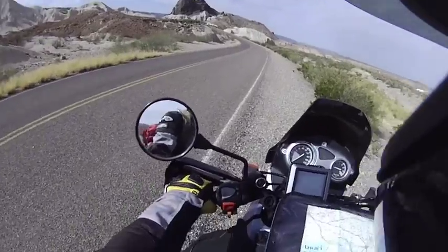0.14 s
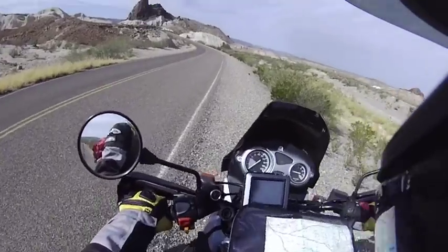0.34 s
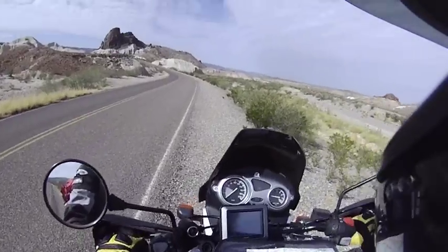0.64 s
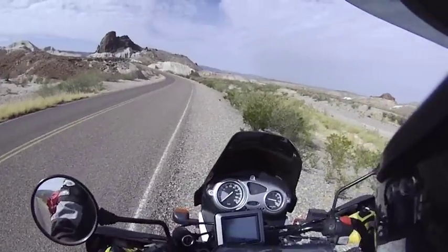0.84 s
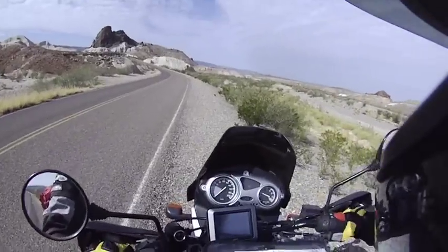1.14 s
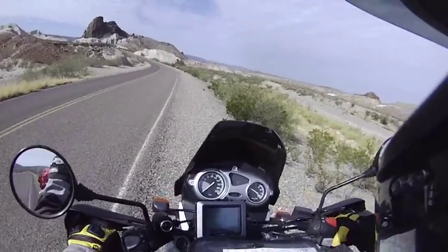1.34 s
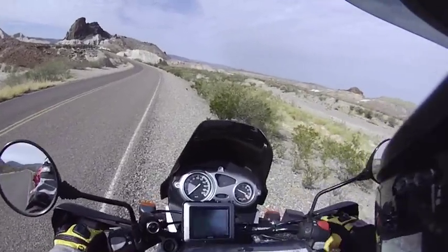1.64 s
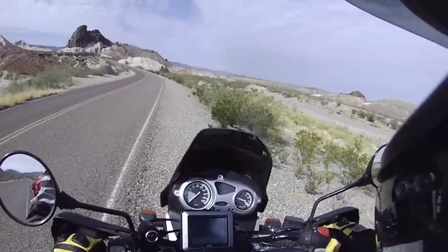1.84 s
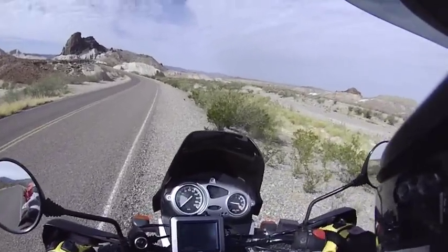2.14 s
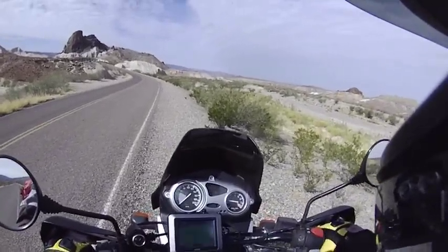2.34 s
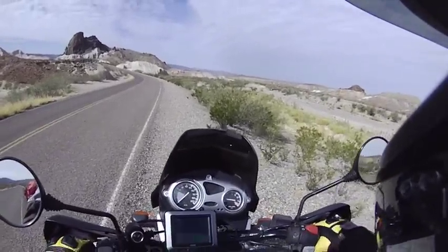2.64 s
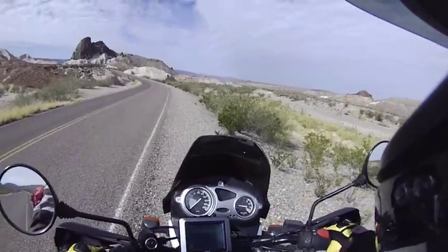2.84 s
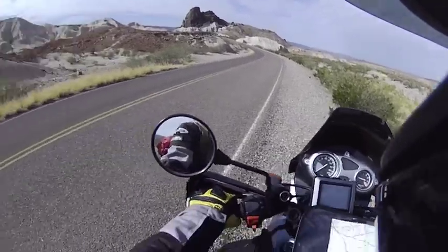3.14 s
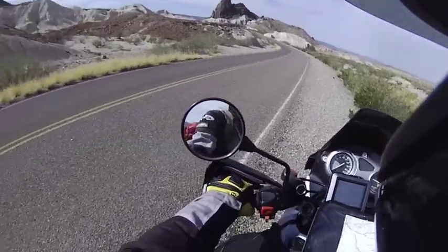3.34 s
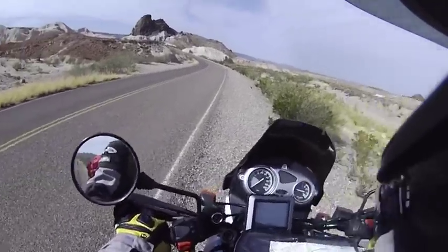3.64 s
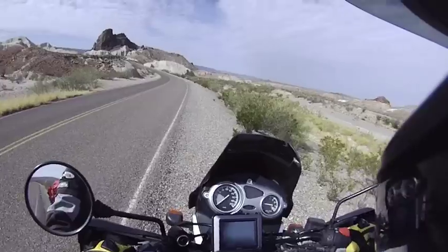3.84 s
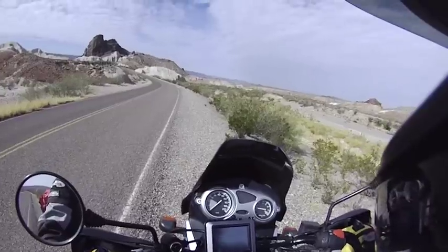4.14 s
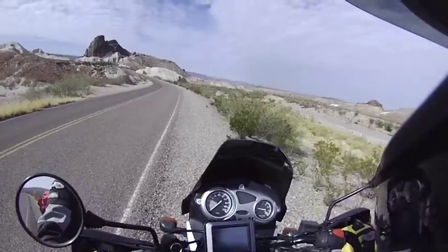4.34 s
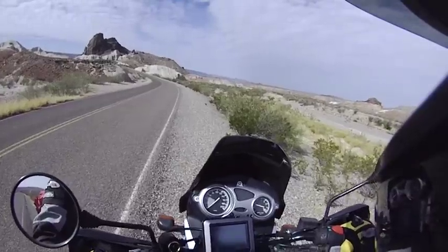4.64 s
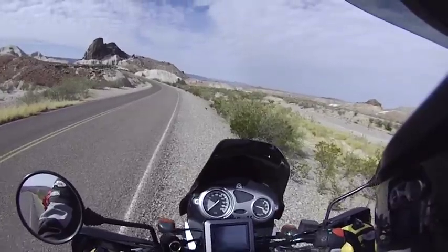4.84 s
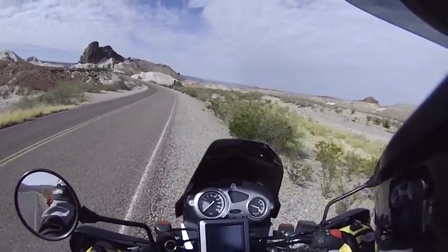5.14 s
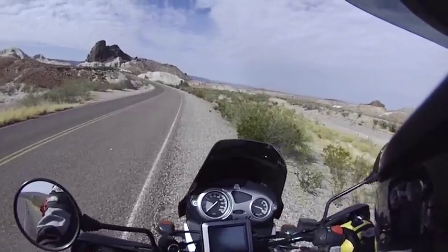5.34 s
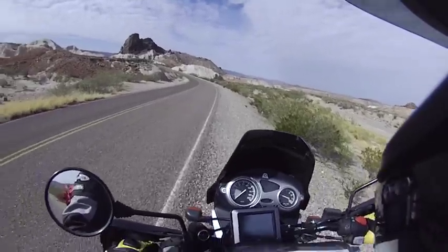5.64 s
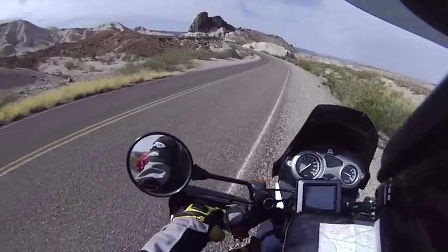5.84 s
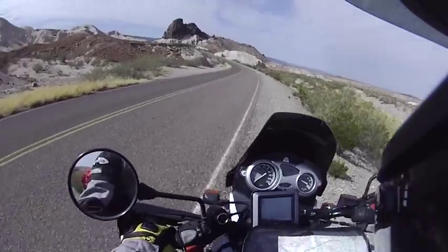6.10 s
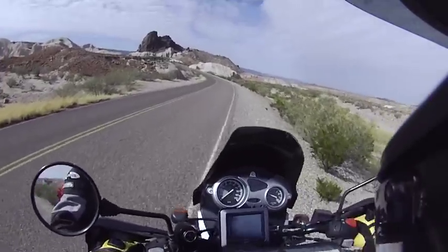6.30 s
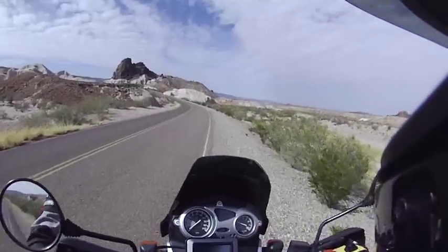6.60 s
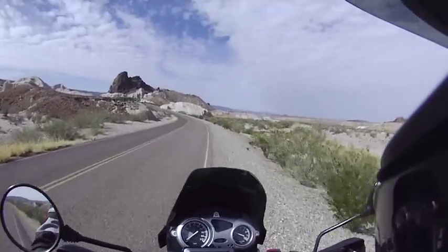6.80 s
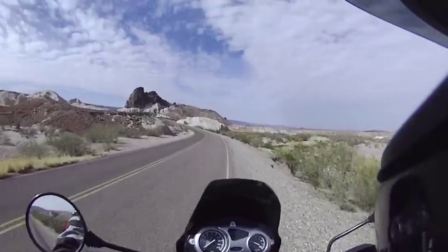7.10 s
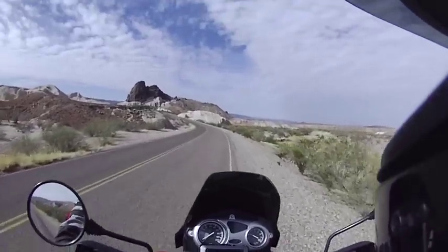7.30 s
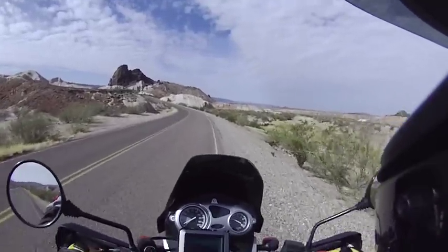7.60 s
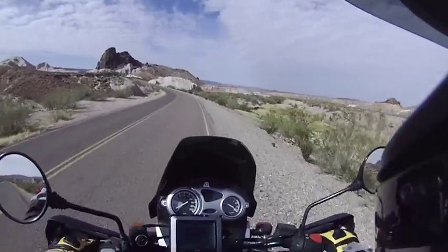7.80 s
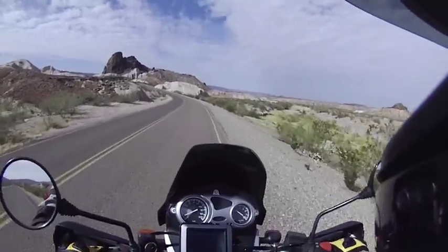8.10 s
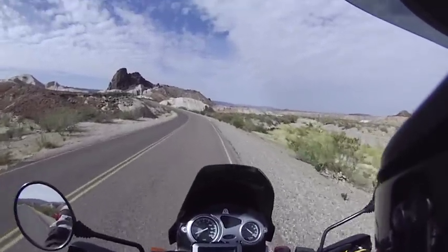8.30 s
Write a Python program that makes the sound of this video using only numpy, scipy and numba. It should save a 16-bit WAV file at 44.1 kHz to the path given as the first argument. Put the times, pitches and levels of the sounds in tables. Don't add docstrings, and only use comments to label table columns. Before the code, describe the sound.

A big single-cylinder motorcycle idles with dull thumps, blips, clunks into gear, fades far quieter by four seconds, then pulls away with wind buffeting.

```python
import sys
import numpy as np
from scipy import signal
from scipy.fft import rfft, irfft
from scipy.io import wavfile
from scipy.ndimage import uniform_filter1d
from numba import njit

SR = 44100
rng = np.random.default_rng(int(sys.argv[2]) if len(sys.argv) > 2 else 0)


def put_to_file(sound):
    columns = np.atleast_2d(sound).T
    safe = np.clip(columns, -1, 1)
    whole_steps = np.round(safe * 32767)
    wavfile.write(sys.argv[1], SR, whole_steps.astype(np.int16))


def boost_factor(decibels):
    exponent = np.asarray(decibels, float) / 20
    return 10 ** exponent


N = 373086
TIME = np.arange(N) / SR

# start_s, firings_per_s
ENGINE_SPEED = [(0, 12.554), (.64, 12.79), (.78, 16.228), (1.02, 19.815), (1.21, 19.72), (1.65, 12.837),
                (2.03, 12.18), (2.67, 12.554), (3.8, 12.414), (3.97, 9.455), (4.08, 12.747), (4.47, 16.323),
                (5.39, 15.697), (6.42, 16.81), (7.05, 18.969), (7.36, 17.622), (8.06, 22.132),
                (8.46, 25.657)]
START_CYCLE, IDLE_PER_S = -.39, 12.5
# start_s, late_ms
FIRING_SHIFT = [(0, 1), (.75, 0), (1.05, 2), (1.3, 4.5), (1.45, 0), (1.65, -7), (1.82, -2), (1.95, 2),
                (2.5, 2.5), (2.9, 2), (3.45, 4.5), (3.67, 1), (3.88, 3.5), (4.1, -1), (5.9, -1.5),
                (6.17, -3.5), (6.45, -1.5), (7.0, -2)]
# start_s, effort_db
THROTTLE_EFFORT = [(0, 3.5), (.6, -2), (.82, 4.5), (1.2, 8), (1.46, 8.5), (1.6, 5.5), (2.1, 5), (2.7, 0.2),
                   (3.06, 8.5), (3.3, 5.5), (3.98, -6), (4.2, 5), (5.8, 4), (6.9, 8.5), (7.35, 8),
                   (7.6, -1), (7.9, 4), (8.25, 10.5)]
# start_s, load_0_to_1
ENGINE_LOAD = [
    (5.6, 0.2),
    (6.8, 0.37),
    (7.5, 0.41),
    (8.0, 0.41),
    (8.1, 0.53),
    (8.22, 0.47),
    (8.3, 0.1),
]
# start_s, slip_0_to_1
CLUTCH_SLIP = [
    (3.9, 0),
    (4.25, 0.94),
    (5.9, 0.95),
    (6.5, 0),
]
CLUTCH_S, CLUTCH_TAKES_S = 4.15, 0.76

# idle_db, db_per_throttle_db, clutch_db (once it bites), full_load_db
THUMP_LAW, BARK_LAW = (-35.5, 0.2, -1.5, -13), (-39, 0.6, -2.5, -3.5)
CLATTER_LAW, KNOCK_LAW = (-55.5, 0.7623, -1.44, -0.66), (-41.5, 0.4644, 0, 5)
FADE_FROM_S, FADE_TO_S, FADE_DB = 2.776, 4.043, -22

PIPE_HZ, PIPE_HZ_PER_FIRING, PIPE_TOP_HZ = 76.5, 2.4, 112
# pitch_hz, width_hz, level_db
SILENCER = [
    (201, 14, -0.5),
    (226, 19, 10.5),
    (261.4, 8.5, 23.5),
]
# pitch_hz, width_hz, level_db
INTAKE = [
    (300, 32, 9.5),
    (341, 6.3, 13),
    (445, 126, 9),
]
# start_s, pipe_db, silencer_db
UNEVEN_FIRINGS = [(0.701, -2, -3.5), (.82, -2, 0), (1.17, -1.5, 0), (1.289, -8, 1.5), (1.39, -13, -3.5),
                  (1.46, -6, 0), (1.52, -0.5, -1.5), (1.58, 2, -0.5), (1.7, 2, -7), (1.8, -1, 0.5),
                  (1.94, 5.5, 1.5), (2.72, 1, 2.5), (2.821, -1, -2.5), (2.981, 0, -2), (3.06, 2, 2),
                  (3.14, 4.5, -2), (3.2, -4, 0), (3.272, 0.5, 2), (2.78, -1, -4.5), (3.9, -2, -2),
                  (4.0, 0, 2), (7.05, 7.5, -12), (7.2, -1, -8), (7.62, 0, 0.5), (7.82, 8, -11),
                  (8.15, -7, 9)]
UNEVEN_S = 0.044

# multiple_of_firing_rate, level_db (under the knock)
MESH_TONES = [
    (15.6, -12),
    (29.0, -21),
    (32.6, -13),
]

# pitch_hz, level_db (per Hz)
RASP_COLOUR = [(410, -46), (700, 4.5), (933, -4.5), (1020, -18.5), (1190, -11), (1770, -15), (2200, -9),
               (2820, -11.5), (3050, -9.5), (3670, -17), (4820, -18.5), (7710, -27.5), (14600, -25),
               (15800, -18)]
# pitch_hz, width_hz, level_db
CASINGS = [(1160, 40, 9.5), (1444, 65, 3), (2220, 26, -0.5), (3040, 52, -1), (3240, 65, -19.5),
           (3774, 42, 6.5), (4035, 110, 4.5), (4730, 100, -1), (4990, 38, 0), (5220, 36, -21),
           (6325, 60, 7.5), (6630, 155, 3), (9160, 60, -30), (10700, 66, -1)]
# start_s, level_db, length_s
RASP_BURSTS = [(0.2, 0.5, 0.063), (0.7, 1, 0.11), (0.92, 0, 0.041), (1.16, 0, .04), (1.45, 1, 0.035),
               (1.86, 1, 0.043), (2.12, 1.5, 0.045), (2.8, -1, 0.037), (3.0, -1, .05), (3.25, -1.5, 0.18),
               (3.52, 1.5, 0.067), (4.03, 3, 0.1), (6.5, 1, 0.11), (7.6, 0.5, 0.054), (8.42, -6.5, 0.049)]
# start_s, level_db, length_s
HELMET_TURNS = [
    (.1, 5, 0.55),
    (3.38, 9.5, 0.52),
    (6.0, 1, .2),
]
# start_s, level_db, length_s
DRIVE_STRAIN = [
    (4.6, 3, 0.42),
    (6.85, 11, 0.5),
    (8.05, 5, .2),
]

# start_s, peak_db, ring_hz, treble_db (over the peak), decay_s
HARD_BLOWS = [(1.327, -28.5, 328.6, -36, 0.099), (1.384, -23, 330, -31, 0.017),
              (1.438, -21.5, 219, -33, 0.011), (1.566, -29.5, 265, -26, 0.033),
              (2.531, -18, 366, -21.5, 0.012), (2.587, -18.5, 348, -26, 0.019),
              (2.644, -26, 795, -19.5, 0.022), (2.655, -17.5, 320, -38, 0.028),
              (2.792, -35, 338, -39, 0.011), (3.255, -30, 226, -22, 0.0072), (6.814, -38, 630, -44, 0.012),
              (8.309, -48.5, 245, -42, 0.016), (8.385, -49, 237, -18, 0.0089), (8.43, -52, 362, -42, 0.017)]
# start_s,
# peak_db, ring_hz
PRESSURE_POPS = [(1.388, -23.5, 300), (1.443, -27, 220), (1.452, -24, 300), (0.922, -22.5, 300),
                 (1.573, -23.5, 150), (2.538, -23, 350), (2.547, -23, 300), (2.593, -16.5, 400),
                 (2.601, -29, 500), (2.615, -26, 350), (2.796, -30, 400), (2.632, -35, 200),
                 (2.702, -28, 250), (2.712, -29, 220), (3.255, -18, 300), (7.088, -37, 350),
                 (7.105, -39.5, 300), (7.34, -41, 277), (7.37, -45, 250), (7.449, -39.5, 250),
                 (7.507, -40, 250), (7.568, -39, 350), (7.683, -43, 250), (7.776, -45, 250),
                 (8.305, -37.5, 252), (8.35, -52, 197), (8.391, -37.5, 200), (8.43, -36, 400)]
# start_s, peak_db, ring_hz
ENGINE_TAPS = [(0.402, -38, 514), (0.674, -30.5, 566), (0.709, -31, 536), (0.744, -27, 538),
               (1.161, -33, 643), (1.329, -29, 563), (1.385, -27, 550), (1.444, -21, 520), (1.819, -27, 544),
               (1.864, -31, 533), (1.948, -30, 501), (2.112, -31, 496), (2.189, -37, 555), (2.274, -33, 493),
               (2.438, -45, 539), (2.794, -33.5, 626)]

BREEZE_FROM_S, BREEZE_FULL_S, BREEZE_DB = 6.34, 7, -62.5
# start_s, level_db, length_s
WIND_GUSTS = [
    (7.1, -1, 0.018),
    (7.21, 2, 0.042),
    (7.36, 5.5, 0.025),
    (7.5, 1, 0.077),
    (7.625, -8, 0.023),
    (7.8, 4, 0.099),
    (8.27, 3, 0.11),
    (8.42, 7, 0.038),
]


def level(x, db):
    return x * boost_factor(db) / np.sqrt(np.mean(x ** 2))


@njit
def svf(x, hz, width):
    y, low_state = np.empty(len(x)), 0.
    band_state = 0.
    for i in range(len(x)):
        g, k = np.tan(np.pi * hz[i] / SR), width / hz[i]
        v = (band_state + g * (x[i] - low_state)) / (1 + g * (g + k))
        band_state = 2 * v - band_state
        low_state += 2 * g * v
        y[i] = k * v
    return y


def band(x, hz, width):
    return svf(x, hz + np.zeros(len(x)), float(width))


def rings(x, table, shift=1):
    return sum(boost_factor(db) * band(x, hz * shift, width) for hz, width, db in table)


def follow(rows):
    return np.interp(TIME, *np.transpose(rows))


def walk(rate):
    hold = int(SR / rate)
    steps = np.repeat(rng.standard_normal(N // hold + 1), hold)
    return 1.2 * uniform_filter1d(steps, hold)[:N]


def swells(rows):
    return sum(db * np.exp(-((TIME - s) / length) ** 2) for s, db, length in rows)


def bump(phase, centre, width):
    return np.exp((np.cos(2 * np.pi * (phase - centre)) - 1) / (2 * np.pi * width) ** 2)


def kicks(count, scatter_db, lag_s):
    late = np.interp(TIME - lag_s, TIME, count)
    at = np.flatnonzero(np.diff(np.floor(late)) > 0)
    out = np.zeros(N)
    out[at] = boost_factor(scatter_db * rng.standard_normal(200)[:len(at)])
    return out


def cyclic(count, repeat):
    steps = 1024
    same = np.interp(count % 1 * steps, np.arange(steps + 1), rng.standard_normal(steps + 1))
    share = np.clip(repeat, 0, 1)
    return np.sqrt(share) * same * 0.5 + np.sqrt(1 - share) * rng.standard_normal(N)


def smooth_speed(count):
    return uniform_filter1d(np.gradient(count) * SR, 4000) / IDLE_PER_S


def wind():
    rolling = np.clip((TIME - BREEZE_FROM_S) / (BREEZE_FULL_S - BREEZE_FROM_S), 0, 1)
    gust = rolling * boost_factor(BREEZE_DB + swells(WIND_GUSTS) + 2.6 * walk(60))
    air = rng.standard_normal(N)
    rumble = band(band(air, 210, 240), 282, 220)
    rumble += 0.28 * band(band(air, 360, 150), 480, 220)
    rumble += 0.56 * band(band(air, 45, 40), 45, 60)
    return gust * level(rumble, 3.06)


def taps():
    out, t = np.zeros(N + 1024), np.arange(1024) / SR
    for s, db, hz in ENGINE_TAPS:
        ring = np.sin(2 * np.pi * hz * t) * np.exp(-t / 0.0065)
        edge = .5 * band(rng.standard_normal(1024), 1800, 1330) * np.exp(-t / 0.0034)
        i = int(s * SR)
        out[i:i + 1024] += boost_factor(db - 1.5) * (ring + edge)
    return out[:N]


def pops():
    out, t = np.zeros(N + 2048), np.arange(2048) / SR
    for s, db, hz in PRESSURE_POPS:
        dip = band(np.exp(-((t - .005) * hz / 0.16) ** 2), hz, 2.4 * hz)
        i = int((s - .005) * SR)
        out[i:i + 2048] -= boost_factor(db) * dip / dip.max()
    return out[:N]


def blows():
    out, t = np.zeros(N + 4096), np.arange(4096) / SR
    for s, db, hz, treble_db, decay_s in HARD_BLOWS:
        noise = rng.standard_normal((2, 4096))
        pulse = -1.8 * band(np.exp(-((t - .004) / .001) ** 2), 330, 600)
        backfire = hz < 265
        pulse -= backfire * 5.5 * band(np.exp(-((t - .004) / 0.0014) ** 2), 72, 28)
        ring = 1.23 * np.cos(2 * np.pi * hz * t) + 0.5 * level(band(noise[0], hz, 88), 0)
        rattle = 9 * band(noise[1], 674, 117) + 1.3 * band(noise[1], 3030, 440)
        rattle += 0.5 * band(noise[1], 4580, 350) + 0.34 * band(noise[1], 6100, 470)
        rattle += 0.023 * noise[1]
        tail = ring * np.minimum(t / 0.01, 1) + level(rattle, treble_db + 18.5)
        tail = tail * np.exp(-t / max(decay_s, .003))
        i = int(s * SR)
        out[i:i + 4096] += boost_factor(db - 7.5) * (pulse + tail)
    return out[:N]


def valve_noise(gate, load, count):
    puff = 0.99 + 0.12 * bump(count, 0.19, 0.085) + 0.16 * bump(count, -0.015, 0.048)
    puff = puff * (1 - 0.22 * np.sqrt(load))
    hz = np.arange(N // 2 + 1) * SR / N + 1
    steady = np.clip(0.062 + 0.33 * np.log2(hz / 1500), 0, .9)
    rasp, hiss = (rfft(rng.standard_normal(N) * g * boost_factor(2.0 * walk(180) + 0.31 * walk(13)))
                  for g in (gate, puff))
    base = np.array(RASP_COLOUR)
    colour = boost_factor(np.interp(np.log(hz), np.log(base[:, 0]), base[:, 1], left=-60))
    return irfft((np.sqrt(1 - steady) * rasp + np.sqrt(steady) * hiss) * colour, N)


def casings(raw, speed):
    out = np.zeros(N)
    for hz, width, db in CASINGS:
        uneven = raw * boost_factor(1.5 * walk(2.17))
        drift = .985 + 0.044 * (speed.clip(1, 1.5) - 1) + 0.0052 * walk(1.5)
        out += boost_factor(db) * band(uneven, hz * drift, max(width, 50))
    return out


def clutch_cover(raw, gated):
    cover = band(gated, 2276, 90) + 0.59 * band(gated, 1180, 150)
    return cover + 0.18 * band(raw, 3280, 180) + 0.27 * band(raw, 4100, 120)


def rocker_cover(gated, count):
    slap = kicks(count + 0.31, 0.6, 0)
    cover = boost_factor(swells(HELMET_TURNS)) * level(band(gated, 1037, 130), -4.5)
    cover += level(band(slap, 1980, 260), -9.0)
    return cover + level(band(band(slap, 890, 370), 1300, 700), -17.0)


def primary_drive(gated):
    rasp = band(band(gated, 1510, 280), 1530, 500) + 0.68 * band(band(gated, 1280, 200), 1280, 400)
    return 1.9 * boost_factor(swells(DRIVE_STRAIN)) * rasp


def tappet(count):
    tick = kicks(count + .35, 1.0, 0) + .3 * kicks(count + .35, 2.0, .003)
    return band(band(tick, 2340, 350), 2560, 700) + 0.5 * band(band(tick, 4600, 300), 2300, 700)


def clatter(count, load):
    since = (count + 0.274) % 1
    speed = smooth_speed(count).clip(1)
    gate = 0.3 * speed ** 3.0 + np.exp(-(since / 0.87) ** 6) + 1.0 * np.exp(-since / 0.099)
    gate = uniform_filter1d(gate / (1.07 * speed ** 2 + 0.59), 90)
    raw = valve_noise(gate, load, count)
    gated = raw * gate
    slip = follow(CLUTCH_SLIP)
    out = raw + casings(raw, speed)
    out += 2.4 * slip * clutch_cover(raw, gated)
    out += np.std(band(out, 5200, 4600)) * (1 - slip) * rocker_cover(gated, count)
    out += np.sqrt(load) * primary_drive(gated)
    shift = 1.14 * band(raw, 3380, 250) - 0.3 * band(out, 2050, 350)
    shift -= 0.5 * band(out, 3850, 300) + 0.39 * band(out, 680, 250)
    out += np.sqrt(load) * shift
    out -= .6 / speed ** 2 * bump(count, .56, .085) * band(out, 1700, 3200)
    harder = load ** 1.5 * np.clip(TIME - 6.6, .2, 1.2)
    return out / np.std(band(out, 3600, 5200)) + harder * level(tappet(count), 2)


def knock(count, load, clutch):
    turns = uniform_filter1d(count, 3000)
    swell = 1.32 + bump(count, 0.86, 0.14)
    tones = np.zeros(N)
    for multiple, db in MESH_TONES:
        loudness = boost_factor(db - 6 + 8 * clutch + (4 - 2.5 * clutch) * walk(6))
        wobble = (1.2 - .9 * clutch) * walk(30)
        tones += loudness * np.sin(2 * np.pi * multiple * turns + wobble)
    whine = band(tones, 255, 45) * clutch + 1.2 * band(tones, 530, 170) + .35 * (1 - clutch) * tones
    noise = cyclic(count, .15 + .6 * clutch - load) * swell
    mesh_hz = np.clip(32 * np.gradient(turns) * SR, 425, 620)
    mesh_hz += .7 * clutch * (515 - mesh_hz)
    whirr = band(band(noise, mesh_hz, 110), 440, 570)
    whirr += 0.2 * (1 - load) * band(band(noise, 827, 210), 710, 580)
    hit = band(band(kicks(count, 1.2, .006), 670, 85), 670, 300)
    gears = (.75 + .25 * clutch) * level(whirr, -2.5) + whine * swell
    return (1 - .65 * load) * gears + load ** 2 * level(hit, 8)


def pipe_thump(count, pipe_hz):
    slug = kicks(count, 1.2, -.0032) + .4 * kicks(count, 1.2, .0098)
    thump = band(band(slug, pipe_hz, 9.4), 55, 170)
    return signal.sosfilt(signal.butter(2, 60, "high", fs=SR, output="sos"), thump)


def exhaust(count, pipe_hz, clutch):
    loose = count + .012 * (1 - clutch) * walk(12)
    rev = np.clip(smooth_speed(count) - 1.05, 0, .5) * 2 * (1 - clutch)
    pulse = -kicks(count, 1.5, 0) - .85 * kicks(loose, 1.5, .0131) - .35 * kicks(loose, 2.0, -.005)
    pulse = np.convolve(pulse, np.hanning(130), "same")
    direct = pulse - uniform_filter1d(pulse, 400)
    direct -= 0.93 * band(direct, 142.7, 71) + 0.65 * band(direct, 630, 360)
    direct -= 1.34 * clutch * band(direct, 470, 450)
    filling = np.clip((count + 0.098) % 1 / 0.39, 0, 1)
    warm = 0.022 * (1 - clutch) * walk(25) + 0.886 + 0.13 * filling
    bark = rings(pulse, SILENCER, warm)
    gas = cyclic(count, .8) * (.18 + bump(count, .12, .18))
    rough = band(rings(gas, SILENCER, warm), 237, 150)
    intake = band(rings(gas, INTAKE), 291, 350)
    low_gas = band(band(gas, 183, 50), 171, 90)
    rev_gas = band(band(gas, 660, 110), 630, 210)
    tail_pipe = band(band(gas, 280.8, 51), 290, 86)
    out = (1 - .45 * rev) * level(direct, -3) + (1 - .45 * clutch) * level(bark, -7.5)
    out += (1 - 0.28 * clutch + 0.4 * rev) * level(rough, -7.5)
    out += level(low_gas, -24) + rev * level(rev_gas, -28)
    out += (1 - clutch) * (1 - .2 * rev) * level(tail_pipe, -13)
    out += np.clip(1 - 1.2 * clutch, 0, 1) * level(intake, -4.5)
    return level(pipe_thump(count, pipe_hz), 0), out


def scene():
    speed = follow(ENGINE_SPEED)
    late_s = follow(FIRING_SHIFT) / 1000
    count = np.interp(TIME - late_s, TIME, START_CYCLE + np.cumsum(speed) / SR)
    throttle = follow(THROTTLE_EFFORT)
    load = np.clip(follow(ENGINE_LOAD), 0, 1)
    clutch = np.clip((TIME - CLUTCH_S) / CLUTCH_TAKES_S, 0, 1)

    def gain(law):
        return boost_factor(law[0] + law[1] * throttle + law[2] * clutch + law[3] * load)

    pipe_hz = np.minimum(PIPE_HZ + PIPE_HZ_PER_FIRING * (speed - IDLE_PER_S), PIPE_TOP_HZ)
    thump, bark = exhaust(count, pipe_hz, clutch)
    thump = thump * boost_factor(swells([(s, db, UNEVEN_S) for s, db, _ in UNEVEN_FIRINGS]))
    bark = bark * boost_factor(swells([(s, db, UNEVEN_S) for s, _, db in UNEVEN_FIRINGS]))
    bike = gain(THUMP_LAW) * thump + gain(BARK_LAW) * bark
    bike += gain(KNOCK_LAW) * knock(count, load, clutch)
    bike += gain(CLATTER_LAW) * boost_factor(swells(RASP_BURSTS)) * clatter(count, load)
    fader = np.interp(TIME, [FADE_FROM_S, FADE_TO_S], [1, boost_factor(FADE_DB)])
    return (bike * fader + wind() + blows() + pops() + taps())[None]


def roll_off(x):
    return signal.sosfilt(signal.butter(12, 15940, fs=SR, output="sos"), x)


def record(dry):
    x = signal.sosfilt(signal.butter(2, 40, "high", fs=SR, output="sos"), dry)
    x = signal.sosfilt(signal.ellip(10, .2, 80, 15350, fs=SR, output="sos"), x)
    return roll_off(x)


dry = scene()
out = record(dry)
put_to_file(out)
```